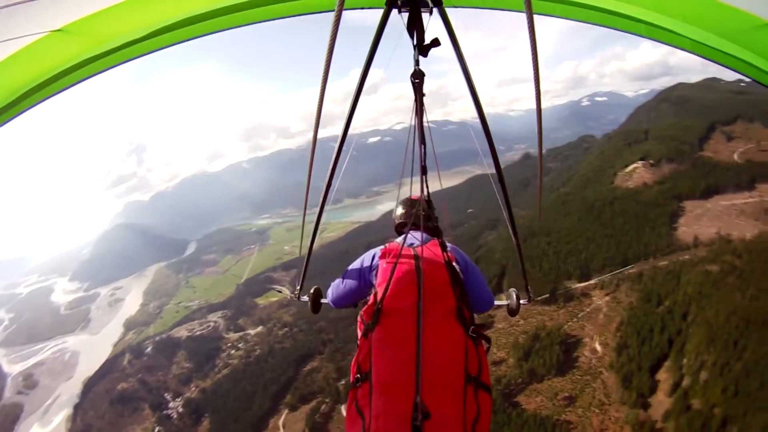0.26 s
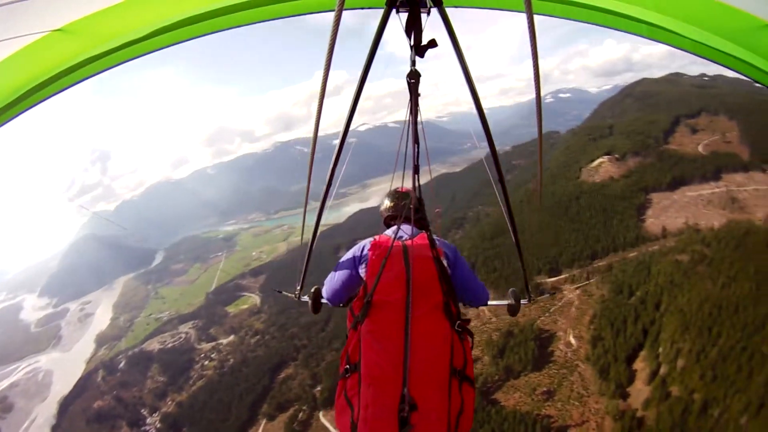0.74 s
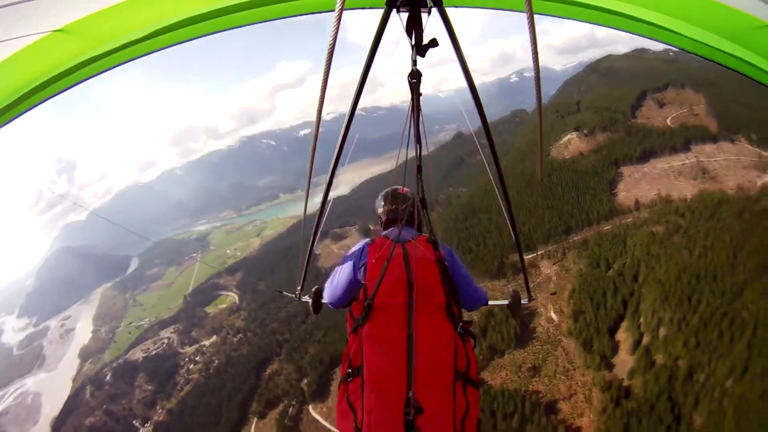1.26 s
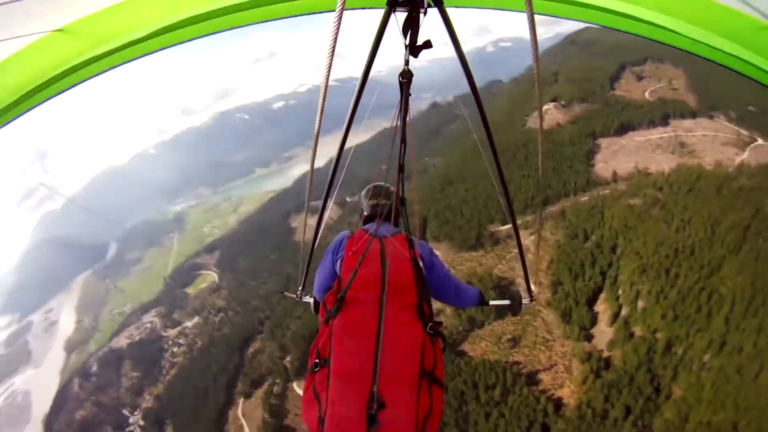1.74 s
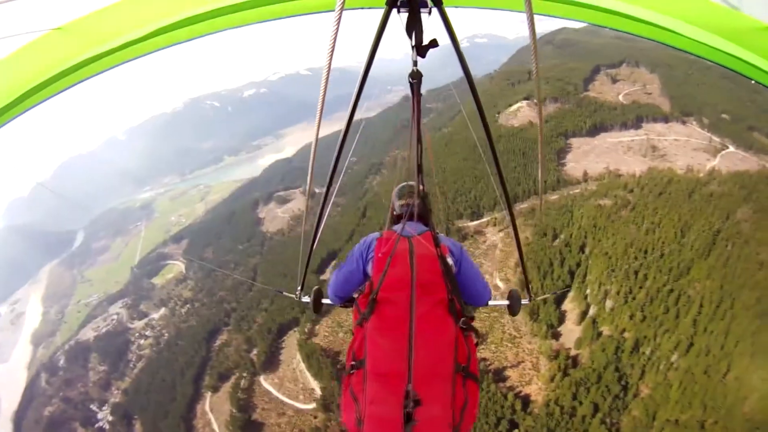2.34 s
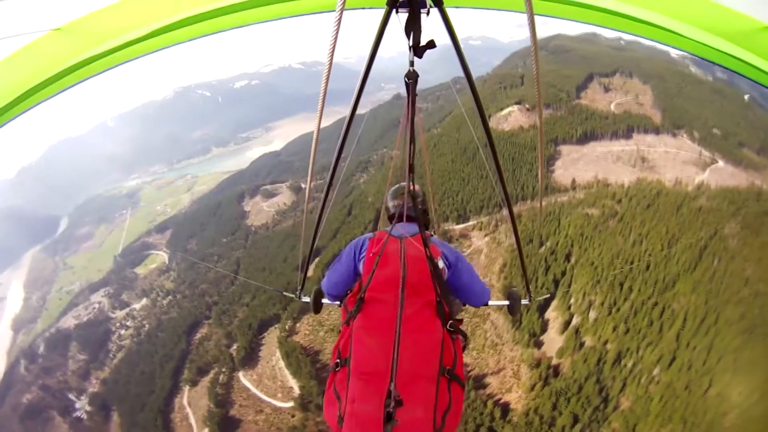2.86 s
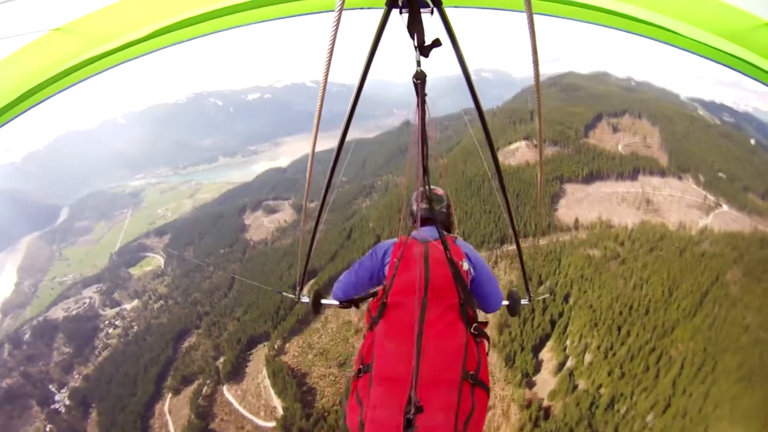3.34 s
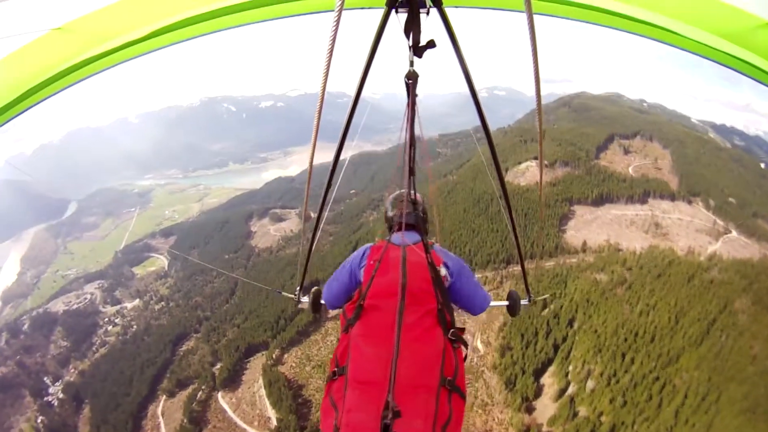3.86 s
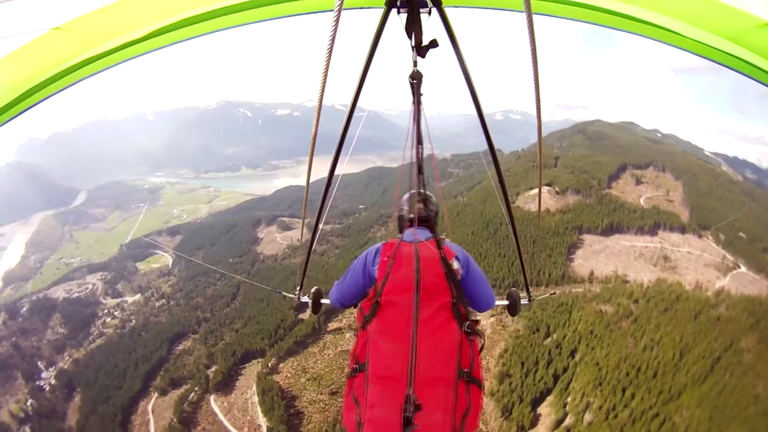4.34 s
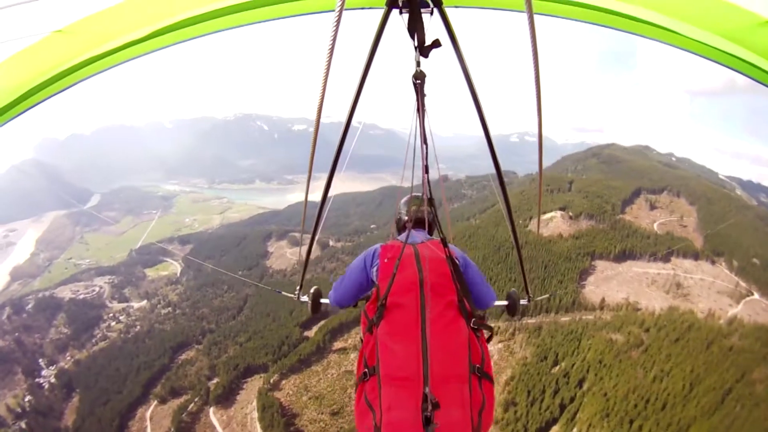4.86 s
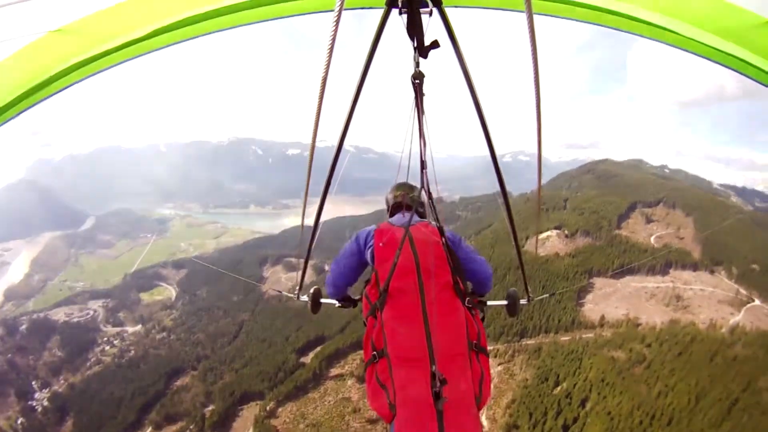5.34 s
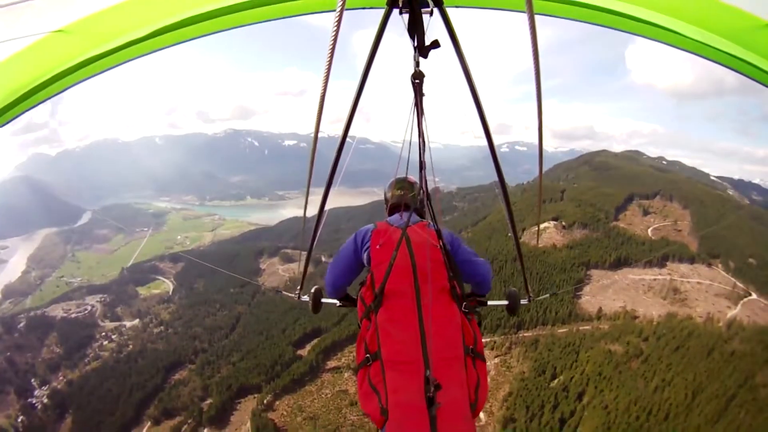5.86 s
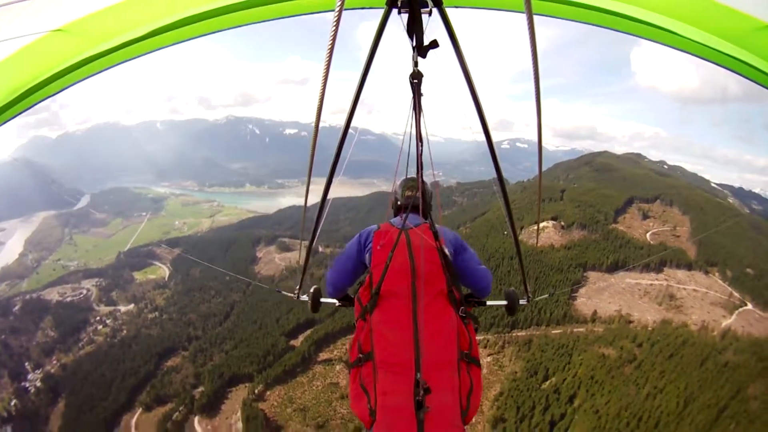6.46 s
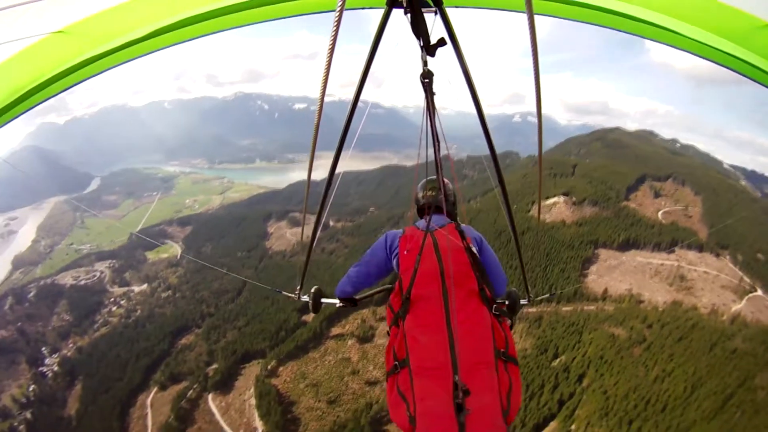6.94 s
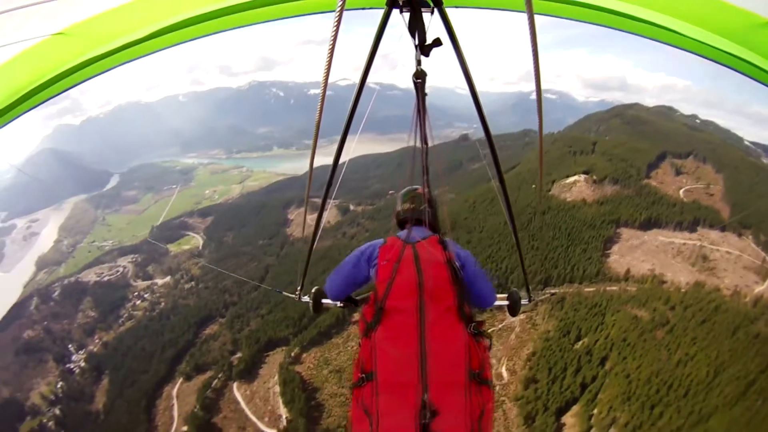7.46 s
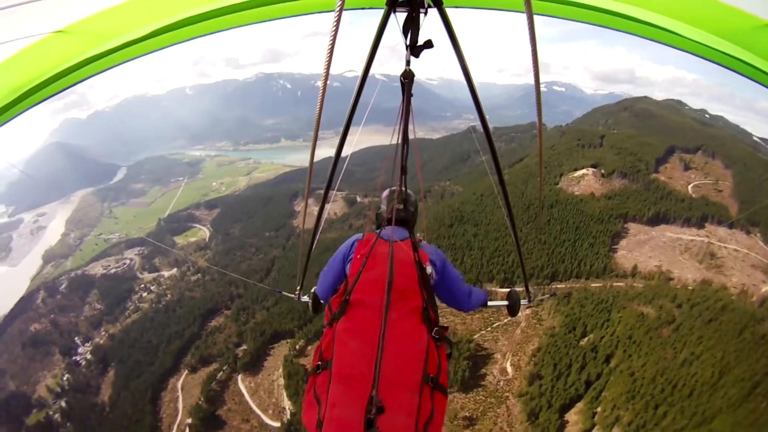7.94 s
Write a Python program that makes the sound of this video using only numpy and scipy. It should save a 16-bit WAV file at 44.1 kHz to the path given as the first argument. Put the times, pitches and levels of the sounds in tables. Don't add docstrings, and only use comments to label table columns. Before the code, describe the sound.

Wind buffets a small enclosed microphone on a gliding hang glider, fluttering and slapping over deep rumble, strongest midway, then easing to soft airflow.

```python
import sys
import numpy as np
from scipy import signal
from scipy.fft import rfft, irfft, next_fast_len
from scipy.io import wavfile
from scipy.ndimage import uniform_filter1d

SR = 44100
rng = np.random.default_rng(int(sys.argv[2]) if len(sys.argv) > 2 else 0)


def magnitude_from_level(level_db):
    exponent = np.asarray(level_db, float) / 20
    return 10 ** exponent


def put_to_file(sound):
    columns = np.atleast_2d(sound).T
    safe = np.clip(columns, -1, 1)
    whole_steps = np.round(safe * 32767)
    wavfile.write(sys.argv[1], SR, whole_steps.astype(np.int16))


N = 361619

CALM_DB = -44
CAVITY_HZ = 1725

# (time [s], peak level [dB], brightness [dB])
SLAPS = [(0.0277, -18.5, -25), (0.066, -28, -27), (0.7377, -23, -17), (1.012, -20, -21), (2.5658, -36, -11),
         (2.6287, -18.5, -13), (2.6718, -23, -27), (3.114, -22.5, -11), (3.2234, -16.5, -31),
         (3.4456, -25, -13), (3.477, -19, -22), (3.5204, -14.5, -25), (3.6934, -21.5, -26),
         (4.0373, -41, -22), (4.2679, -9.5, -22), (4.3416, -22, 0), (4.4025, -18, -28), (4.537, -29, 4),
         (4.6284, -20, -18), (4.6595, -16.5, -19), (4.7448, -20, -27), (5.0203, -22, -18),
         (5.0864, -28, -16), (5.3018, -33, -30), (5.351, -24.5, -23), (5.8326, -24, -17),
         (6.0502, -21, -17), (6.6046, -30, -28), (6.7381, -25, -33), (7.8697, -30, -35)]
# (time [s], peak level [dB], brightness [dB])
MORE_SLAPS = [(0.7038, -29, -17), (.8056, -26.5, -17), (1.1323, -32, -2.5), (1.156, -23.5, -21),
              (1.5682, -26.5, -15), (2.386, -19.5, -28), (2.585, -21, -12), (2.7614, -32, 2),
              (2.846, -26, -11), (3.077, -20, -18), (3.5643, -26, -8), (3.7386, -33, -14),
              (3.796, -26, -30), (3.8684, -22.5, -15), (3.934, -18, -14), (4.055, -21.5, -17),
              (4.0983, -20.5, -17), (4.162, -26, -11), (4.321, -20, -9), (4.5626, -25.5, -4.5),
              (4.586, -23, -5), (4.768, -23, -23), (4.8254, -19.5, -30), (4.8598, -23.5, -31),
              (4.9254, -30, -14), (5.6317, -30, -10), (5.7927, -22.5, -20), (6.198, -33, -9),
              (6.819, -38, -16), (6.955, -45, -14)]
# (frequency [Hz], level [dB per Hz])
EDGE = [(1800, -23.5), (2600, -3), (3000, 2.5), (3400, 2.5), (4400, 0), (5900, -18.5), (7000, -29.5),
        (9000, -35.5), (14000, -60.5)]
# (time [s], peak level [dB], low mode above the peak [dB])
TICKS = [(1.133, -67, 20), (1.9899, -48.5, 2), (2.0644, -59, 17), (2.3675, -57, 7), (2.631, -52, 3),
         (2.7626, -64, 12), (4.539, -71, 3), (4.672, -51, -4), (5.086, -69.5, 34), (6.048, -49.5, 6),
         (6.0644, -70, 6), (6.2005, -59, 15), (6.8196, -64, 17), (6.9536, -67, 13), (8.065, -63, 16)]


def rms_one(x):
    return x / np.sqrt(np.mean(x ** 2) + 1e-20)


def white():
    return rng.standard_normal(N)


def drift(rate):
    r = np.exp(-2 * np.pi * rate / SR)
    slow = signal.lfilter([1], [1, -2 * r, r * r], rng.standard_normal(N + SR))[SR:]
    return rms_one(slow - slow.mean())


def in_time(rows):
    s, *columns = np.transpose(rows)
    return [np.interp(np.arange(N) / SR, s, column) for column in columns]


def bumps(rows):
    t = np.arange(0, N, 32) / SR
    total_db = sum(db * np.exp(-((t - s) / half_s) ** 2) for s, half_s, db in rows)
    return np.interp(np.arange(N) / SR, t, total_db)


def evened(x, span_s):
    power = uniform_filter1d(x ** 2, size=int(span_s * SR))
    return rms_one(x / np.sqrt(power + 0.57 * np.mean(x ** 2)))


def colour(x, spectrum):
    size = next_fast_len(len(x) + SR) // 2 * 2
    hz = np.maximum(np.arange(size // 2 + 1) * SR / size, 1)
    points = np.array(spectrum)
    gain = magnitude_from_level(np.interp(np.log(hz), np.log(points[:, 0]), points[:, 1]))
    cepstrum = irfft(np.log(rms_one(gain)), size)
    cepstrum[1:size // 2] *= 2
    cepstrum[size // 2 + 1:] = 0
    filtered = irfft(rfft(x, size) * np.exp(rfft(cepstrum)), size)
    return filtered[len(x) - N:len(x)]


def resonator(hz, width_hz):
    r, w = np.exp(-np.pi * width_hz / SR), 2 * np.pi * hz / SR
    mode = [1, 0, -1, 1, -2 * r * np.cos(w), r * r]
    return [mode, mode]


def puffs(s, level_db, rise_s, fall_s, hz=0):
    marks = np.zeros(N)
    marks[(s * SR).astype(int)] = magnitude_from_level(level_db)
    t = np.arange(SR // 20) / SR
    shape = (1 - np.exp(-t / rise_s)) ** 2 * np.exp(-t / fall_s)
    return signal.fftconvolve(marks, shape / shape.max() * np.cos(2 * np.pi * hz * t))[:N]


def slaps(gust_db):
    # (time [s], peak level [dB], brightness [dB])
    calm_slaps = [(.0927, -26, -23), (.294, -26, -23), (0.353, -26, -28), (.3775, -23, -23),
                  (0.418, -28, -22), (.5983, -34, -17), (0.9107, -35, -23), (5.0395, -27, -25),
                  (5.2643, -29, -24), (5.4262, -29, -25), (5.4675, -25, -22), (5.694, -29, -25),
                  (5.7493, -26, -27), (5.9636, -32, -10), (6.0928, -30, -30), (6.327, -29, -15),
                  (6.406, -28, -22), (6.523, -33, -22), (6.72, -36, -10), (7.233, -33, -20),
                  (7.313, -42, -22), (7.353, -36, -26), (7.4088, -34, -22), (7.447, -34, -29),
                  (7.5996, -39, -22), (7.6261, -36, -25), (7.73, -36, -24), (7.7796, -35, -22),
                  (7.8254, -34, -28), (7.9893, -34, -18)]
    slaps_per_s = 30
    over_wind_db, spread_db, calm_share = 9.5, 8, .15
    bright_db, bright_spread_db = -17.5, 4
    draws = rng.standard_normal((400, 3))
    s = np.cumsum(np.abs(draws[:, 0]) + .3) / slaps_per_s
    listed = np.array(SLAPS + MORE_SLAPS + calm_slaps)
    free = (s < N / SR) & (np.abs(s[:, None] - listed[:, 0]).min(axis=1) > .02)
    s, draws = s[free], draws[free]
    wind_db = gust_db[(s * SR).astype(int)]
    peak_db = wind_db - calm_share * (wind_db - CALM_DB) + over_wind_db
    peak_db = peak_db + spread_db * np.tanh(draws[:, 1])
    common = np.transpose([s, peak_db, bright_db + bright_spread_db * np.tanh(draws[:, 2])])
    return np.transpose(np.vstack([listed, common]))


def buffet(level_db, bright_db, lumps_db):
    # (frequency [Hz], level [dB per Hz])
    cavity = [(290, -45), (500, -25.5), (631, -12), (737, -12), (1260, -6), (1670, -1.5), (2700, -22.5),
              (3510, -41), (5940, -120)]
    eddies = white()
    s, slap_db, slap_bright_db = slaps(level_db)
    low = magnitude_from_level(lumps_db + level_db - 3.0) + puffs(s, slap_db - 14, 0.002, 0.0018)
    high = magnitude_from_level(0.48 * lumps_db + 2.7 * drift(120) + level_db + bright_db - 2.5)
    high = high + puffs(s, slap_db + slap_bright_db - 15, .0016, .0018)
    ringing = puffs(s, slap_db - 8, .0009, .0016, hz=CAVITY_HZ)
    crest = puffs(s, slap_db - 14, .004, 0.0045)
    crest = crest - uniform_filter1d(crest, size=SR // 30)
    return colour(eddies * low, cavity) + colour(eddies * high, EDGE) + ringing + crest


def lumps(level_db, push):
    flow = 0.5 * drift(60) + 0.88 * drift(170) + 0.18 * push
    flow = rms_one(flow - uniform_filter1d(flow, size=SR // 14))
    depth_db = 5.0 - 0.14 * (level_db + 48.0)
    return depth_db * np.where(flow > 0, 1.34 * np.tanh(flow / 1.37), flow)


def gaps():
    lead_s, half_s, change_db = 0.0074, 0.0054, -0.5
    return bumps([(s - lead_s, half_s, change_db) for s, *_ in SLAPS + MORE_SLAPS])


def rumble(eddy_db, frame_db, shake_db):
    # (frequency [Hz], level [dB per Hz])
    eddy_spectrum = [(2.9, -38), (5.0, -2), (27, 1), (60, -8), (78, -15.5), (130, -120)]
    # (frequency [Hz], level [dB per Hz])
    shake_spectrum = [(40, -28), (60, 0.5), (100, -6.5), (130, -6), (230, -15.5), (300, -42), (500, -100)]
    running = rng.standard_normal((2, N + SR))
    push = evened(colour(running[0], eddy_spectrum), span_s=0.12)
    frame = signal.sosfilt(resonator(81.05, width_hz=18.3), running[1])[SR:]
    frame = evened(frame, span_s=0.14)
    shake = colour(white() * rms_one(magnitude_from_level(0.62 * drift(24))), shake_spectrum)
    low = magnitude_from_level(eddy_db) * push + magnitude_from_level(frame_db - 1.5) * frame + magnitude_from_level(shake_db + 4.5) * shake
    return low, push


def frame_level(over_db):
    # (time [s], half length [s], level change [dB])
    surges = [(.4, 0.088, -2.5), (1.48, 0.092, -10), (1.89, 0.078, 3.5), (2.15, 0.12, 4.5),
              (2.5, 0.097, 3.5), (3.1, 0.12, 5), (3.68, 0.073, 6.5), (4.29, 0.063, 7), (4.66, 0.097, 2.5),
              (5.37, 0.079, 7), (5.78, .08, 5), (6.21, .04, 8.5), (6.5, 0.058, -3), (6.83, 0.074, 3.5),
              (7.3, 0.1, 3.5), (7.76, 0.061, 5)]
    wind_share, wander_db = 0.18, 0.5
    return -44 + wind_share * over_db + wander_db * drift(2.2) + bumps(surges)


def whistle(level_db):
    mode = resonator(CAVITY_HZ, width_hz=326)
    noise = white()
    return signal.sosfilt(mode, noise * magnitude_from_level(level_db)) / np.std(signal.sosfilt(mode, noise))


def airflow(level_db, lumps_db):
    # (frequency [Hz], level [dB per Hz])
    air_spectrum = [(120, -37), (200, -6), (420, -3.5), (620, -4), (1100, -9.5), (1700, -18), (2700, -43.5),
                    (4500, -30.5), (6000, -45), (8000, -67)]
    return colour(white() * magnitude_from_level(level_db + 1.22 + 0.83 * drift(25) + 0.72 * lumps_db), air_spectrum)


def ticks():
    # (frequency [Hz], level [dB], time to fall by 60 dB [s])
    tick_modes = [(5860, 0.5, 0.014), (7600, -18, .012), (10200, -21, .01)]
    # (frequency [Hz], level above the low level [dB], time to fall by 60 dB [s])
    tick_body = [(3020, -0.5, 0.018), (4500, -21, 0.011)]
    s, peak_db, low_db = np.transpose(TICKS)
    out, mount = np.zeros(N), np.exp(-1 / (.0008 * SR))
    body = [(hz, db + low_db, t60) for hz, db, t60 in tick_body]
    for hz, level_db, t60 in tick_modes + body:
        clicks = np.full(N, 1e-18)
        clicks[(s * SR).astype(int)] = magnitude_from_level(peak_db + level_db - 1.5)
        r, w = magnitude_from_level(-60 / (t60 * SR)), 2 * np.pi * hz / SR
        through_mount = [1, -2 * mount * np.cos(w), mount ** 2]
        pushed = signal.lfilter([1 - mount, 0, mount - 1], through_mount, clicks)
        out += signal.lfilter([0, np.sin(w)], [1, -2 * r * np.cos(w), r * r], pushed)
    return out


def cracks():
    s, peak_db, low_db = np.transpose(TICKS)
    snap = puffs(s, peak_db + 0.35 * low_db + 2, rise_s=0.00024, fall_s=0.0011)
    return colour(white() * snap, EDGE)


def scene():
    # (time [s], buffet level [dB], extra brightness from slanting flow [dB])
    gust = [(0, -41, -2), (.5, -48, -2), (.95, -46, -2), (1.2, -39, -1.5), (1.75, -45.5, -4.5),
            (2.05, -40, 1), (2.42, -40, -0.5), (2.7, -41, 4), (3.0, -38, -2), (3.3, -33, 2.5),
            (3.98, -37, -5), (4.12, -30, 0.5), (4.45, -34, 2.5), (4.62, -37.5, -1.5), (5.15, -49, 4.5),
            (5.75, -45.5, -1), (6.8, -51, -5), (8.2, -55.5, 6)]
    # (time [s], push level [dB])
    swell = [(0, -33), (.4, -37), (1.25, -35.5), (1.45, -32), (1.6, -37), (2.45, -36.5), (2.72, -33.5),
             (3.2, -34), (3.38, -29), (3.54, -29), (3.65, -41.5), (3.8, -34), (4.18, -33), (4.3, -29),
             (4.6, -33.5), (5.0, -32.5), (6.15, -38), (8.2, -38)]
    # (time [s], half length [s], level change [dB])
    breaks = [(.045, 0.018, -6), (.09, 0.021, 2.5), (.27, 0.014, -10), (.31, 0.027, 5.5), (.46, 0.018, -13),
              (.65, 0.033, 3.5), (.8, 0.013, 10.5), (.96, 0.061, -3), (1.21, 0.038, -0.5),
              (1.34, .03, -3.5), (2.28, .015, -3), (2.4, 0.06, 4), (2.56, 0.012, -11), (3.97, 0.073, -3),
              (4.36, 0.039, 5.5), (4.43, 0.023, 4), (4.525, 0.026, -8), (4.61, 0.0081, -9),
              (4.66, 0.073, 5), (4.73, .015, -11.5), (4.77, 0.014, 5.5), (5.1, 0.028, -0.5),
              (6.05, 0.0076, 4), (6.74, 0.036, 2.5), (6.9, 0.011, -14), (6.94, 0.016, -14),
              (6.96, 0.059, 11), (7.08, 0.023, 7), (7.33, .02, -5), (7.9, 0.023, -6)]
    # (time [s], half length [s], level change [dB])
    jolts = [(.36, 0.049, 7), (1.1, 0.16, -4), (1.69, .03, 7), (1.79, 0.072, 7.5), (1.89, 0.09, -13),
             (2.0, 0.024, 6), (2.3, 0.21, -3.5), (2.74, 0.087, 3.5), (3.03, 0.089, -2.5), (3.29, 0.028, 3),
             (3.45, 0.043, 5.5), (4.06, 0.034, 6), (4.53, 0.057, 5), (4.68, 0.075, 10.5), (4.93, 0.15, 5.5),
             (5.09, 0.077, 5), (5.37, 0.18, 6.5), (5.56, 0.11, 2.5), (5.78, 0.12, 4), (5.96, 0.054, -3),
             (6.07, 0.036, 12), (6.21, 0.023, 8), (6.6, 0.15, -1.5), (6.84, 0.024, 8.5), (7.1, 0.038, 7.5),
             (7.27, .04, 3), (7.55, .06, 1), (7.76, 0.029, 5), (8.09, 0.078, 9)]
    wind_db, oblique_db = in_time(gust)
    eddy_db, = in_time(swell)
    over_db = wind_db - CALM_DB
    break_db, jolt_db = bumps(breaks), bumps(jolts)

    shake_db = -50.5 + 0.22 * over_db + jolt_db
    low, push = rumble(eddy_db, frame_level(over_db), shake_db)

    gust_db = wind_db + break_db
    lumps_db = lumps(gust_db, push) + gaps()
    bright_db = -18.5 + 0.071 * over_db - 0.21 * break_db + oblique_db
    shell = buffet(gust_db, bright_db, lumps_db)

    song = whistle(gust_db + lumps_db - 13 + 0.36 * over_db)
    air = airflow(-50 + 0.32 * over_db + 0.34 * jolt_db, lumps_db)
    return (shell + low + song + air + ticks() + cracks())[None]


def low_pass(x):
    return signal.sosfilt(signal.butter(12, 15000, fs=SR, output="sos"), x)


def record(dry):
    hiss = magnitude_from_level(-79.5) * white()
    top_cut = signal.ellip(10, .1, 12, 14170, fs=SR, output="sos")
    return low_pass(signal.sosfilt(top_cut, dry + hiss))


dry = scene()
out = record(dry)
put_to_file(out)
```